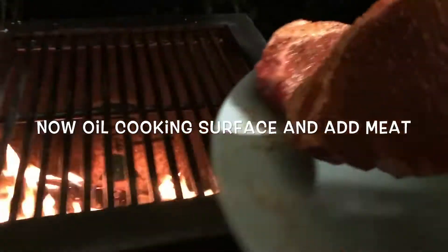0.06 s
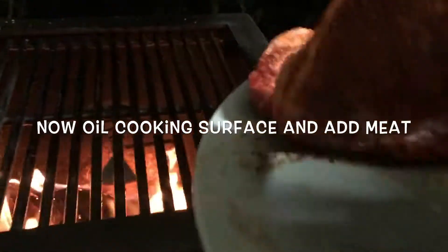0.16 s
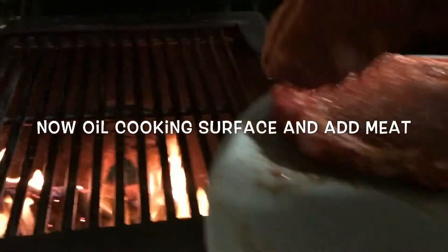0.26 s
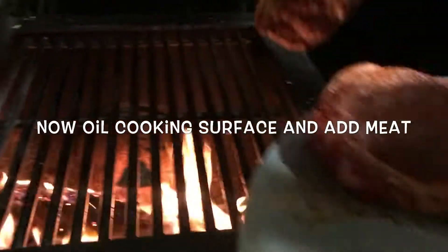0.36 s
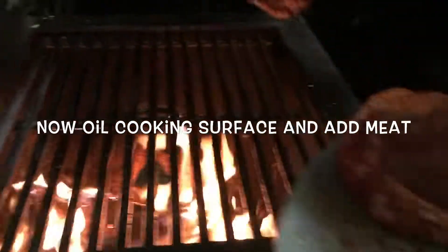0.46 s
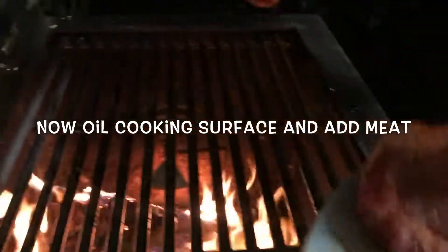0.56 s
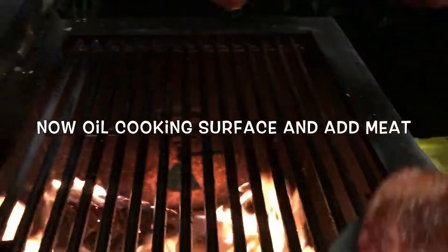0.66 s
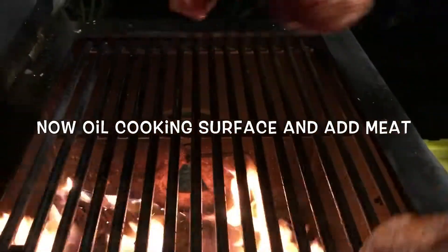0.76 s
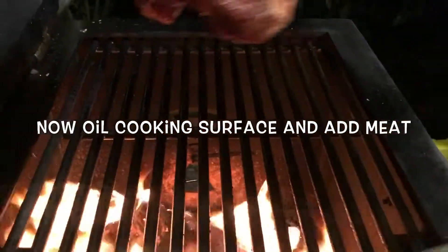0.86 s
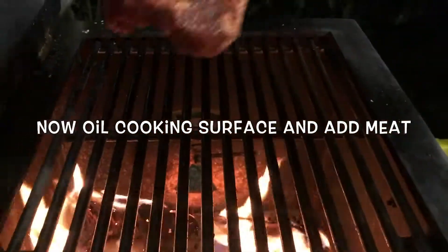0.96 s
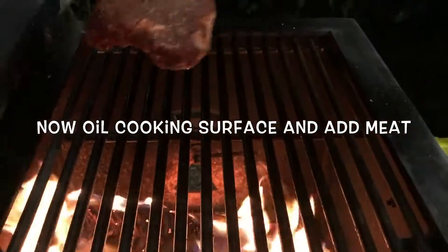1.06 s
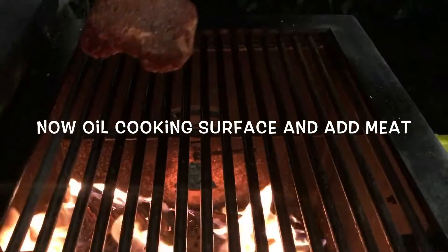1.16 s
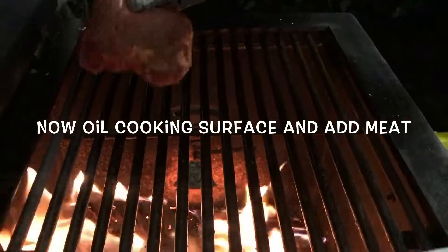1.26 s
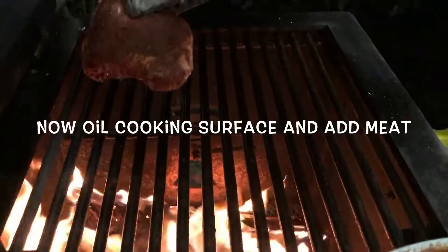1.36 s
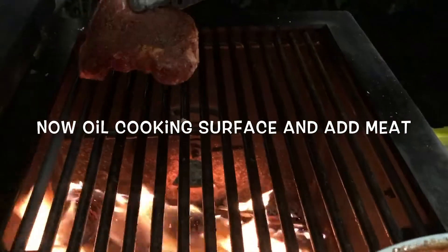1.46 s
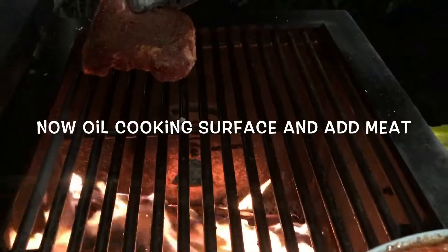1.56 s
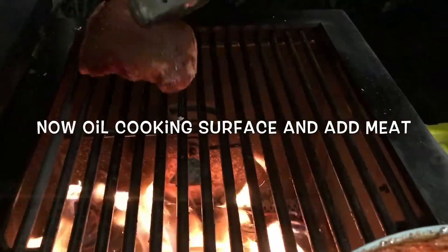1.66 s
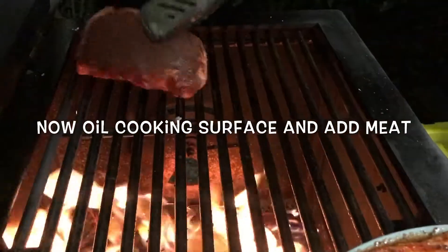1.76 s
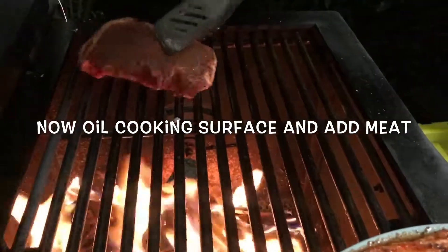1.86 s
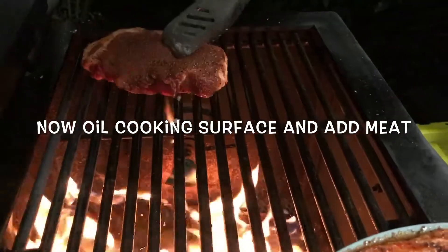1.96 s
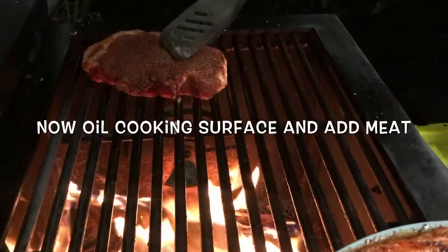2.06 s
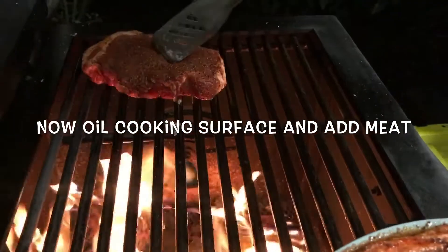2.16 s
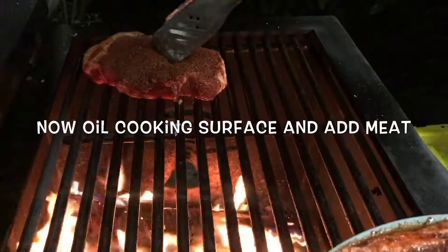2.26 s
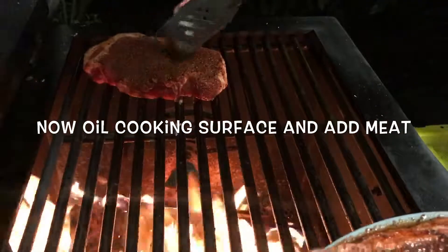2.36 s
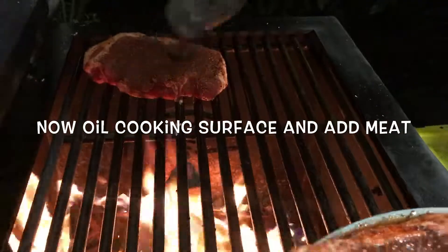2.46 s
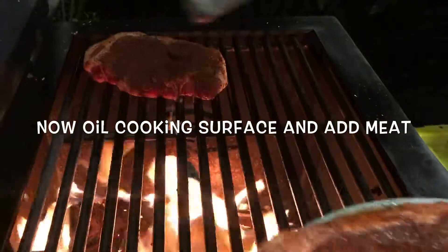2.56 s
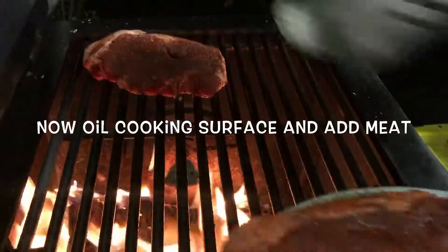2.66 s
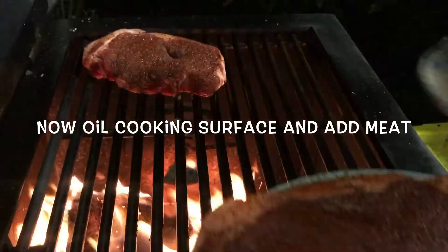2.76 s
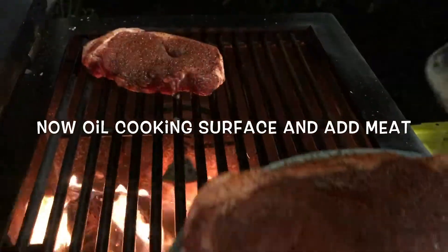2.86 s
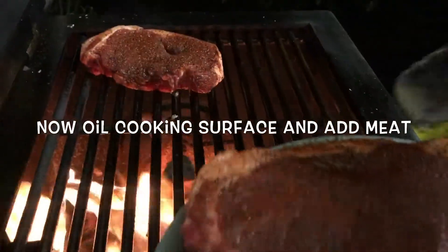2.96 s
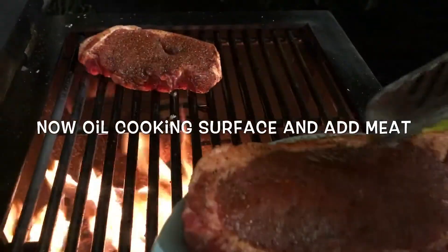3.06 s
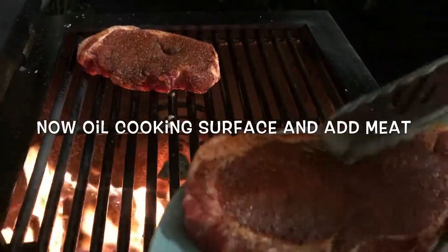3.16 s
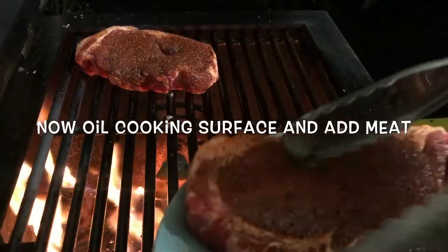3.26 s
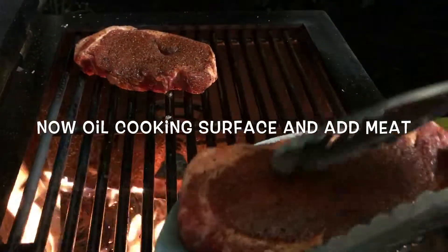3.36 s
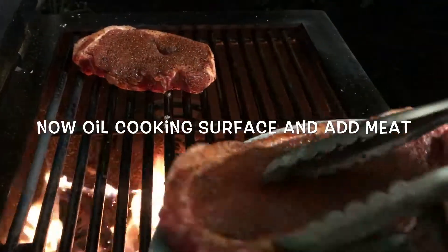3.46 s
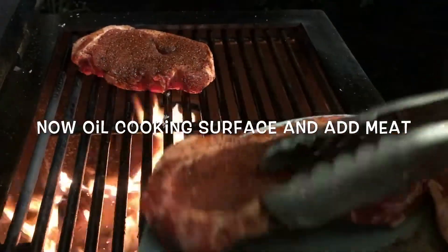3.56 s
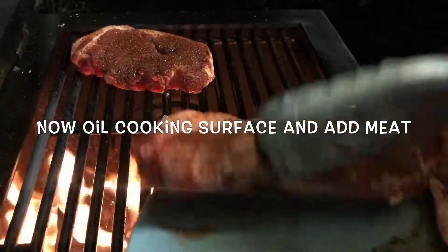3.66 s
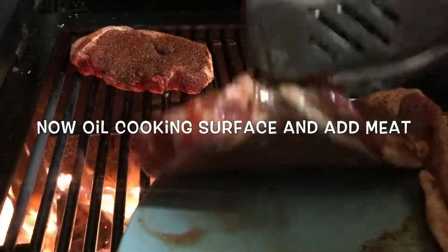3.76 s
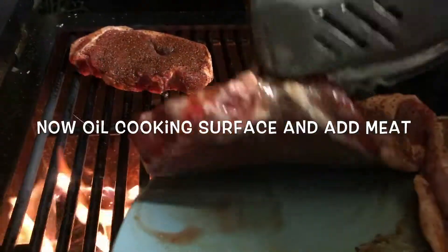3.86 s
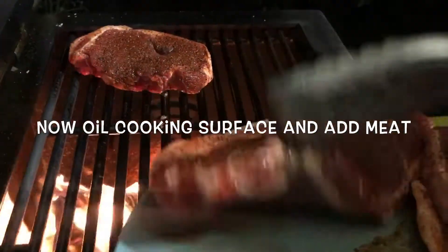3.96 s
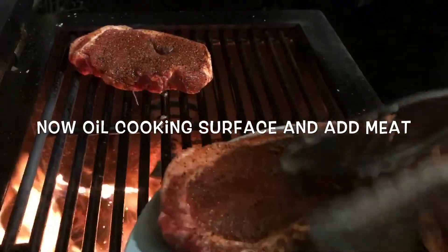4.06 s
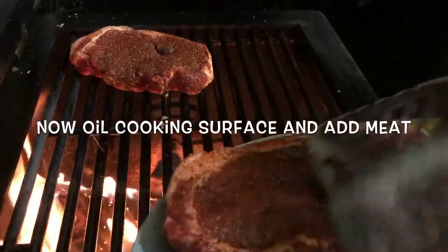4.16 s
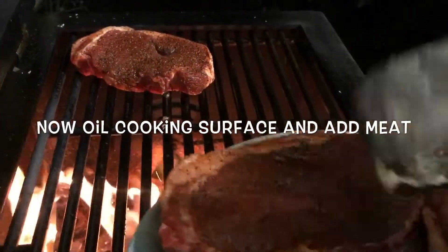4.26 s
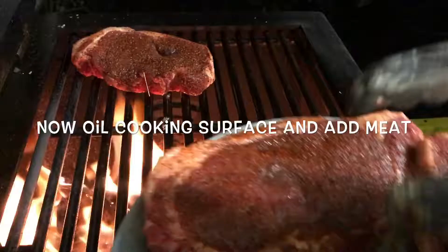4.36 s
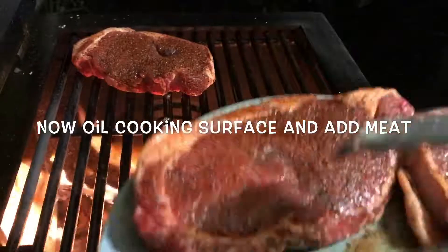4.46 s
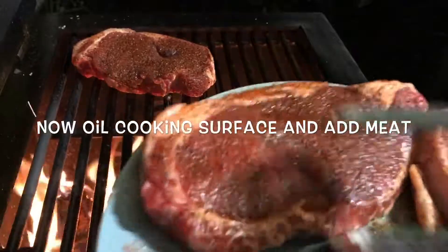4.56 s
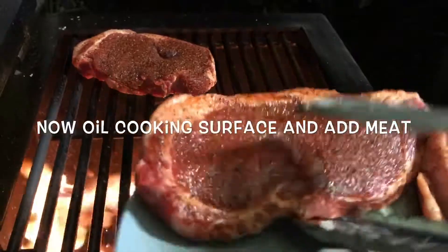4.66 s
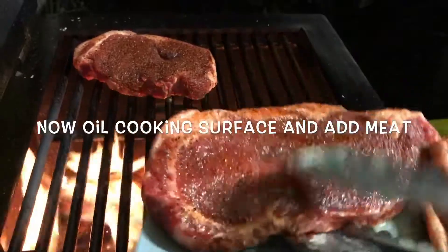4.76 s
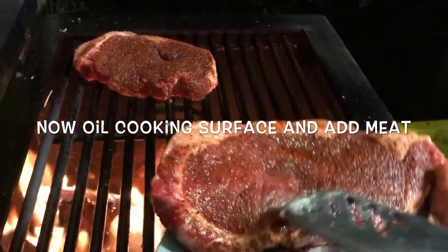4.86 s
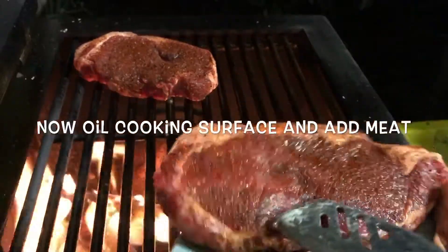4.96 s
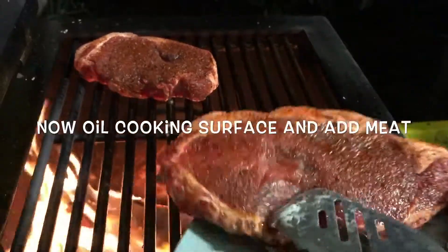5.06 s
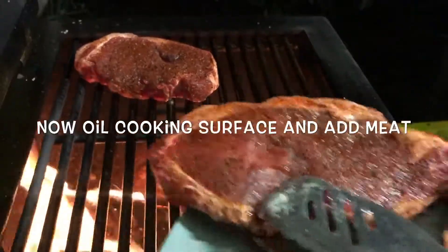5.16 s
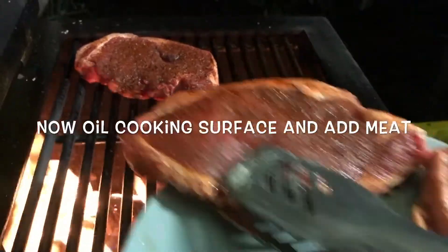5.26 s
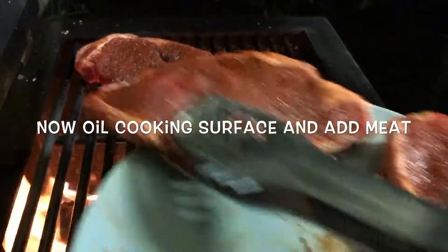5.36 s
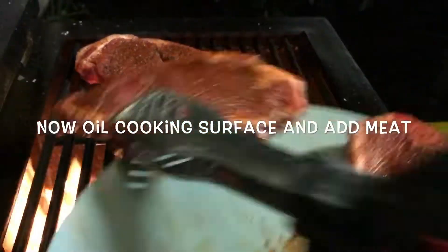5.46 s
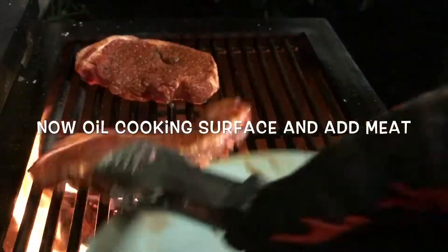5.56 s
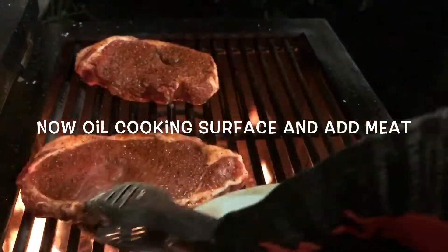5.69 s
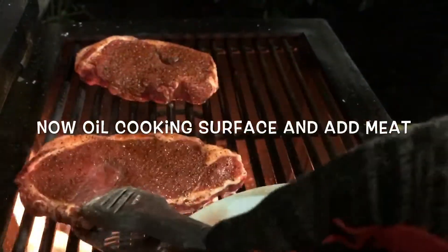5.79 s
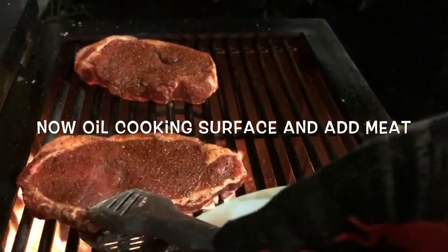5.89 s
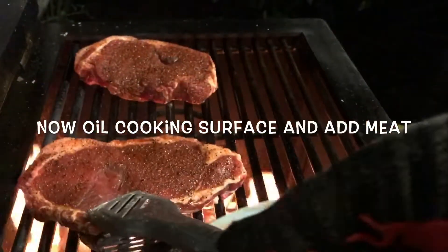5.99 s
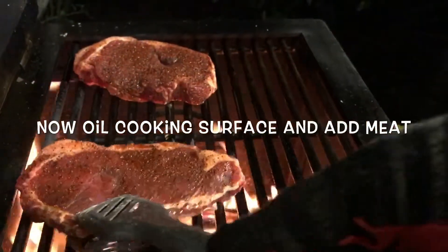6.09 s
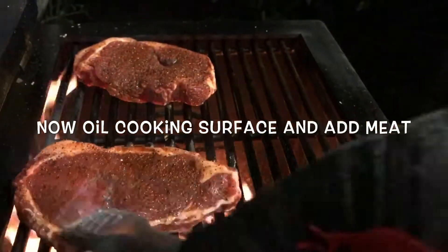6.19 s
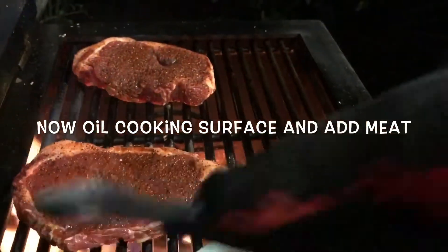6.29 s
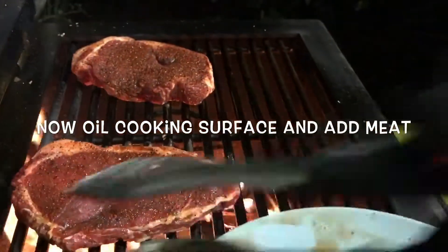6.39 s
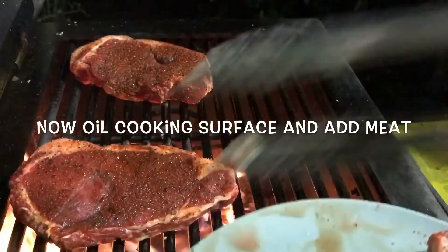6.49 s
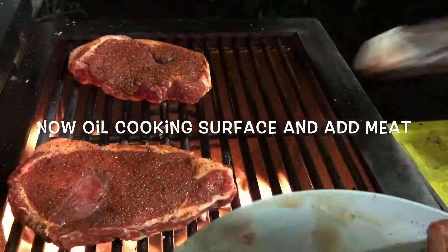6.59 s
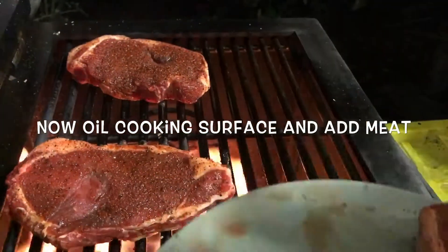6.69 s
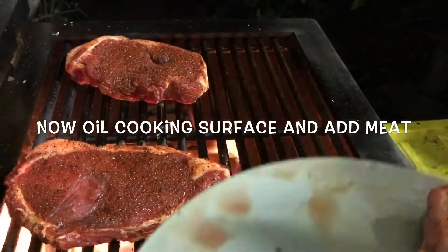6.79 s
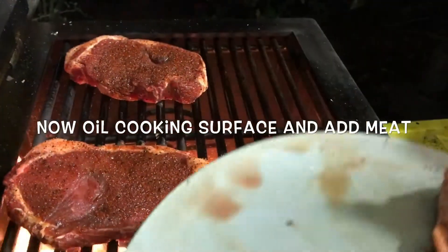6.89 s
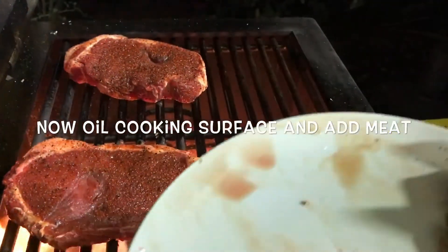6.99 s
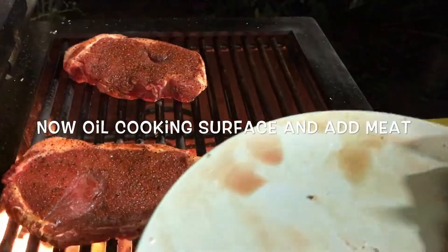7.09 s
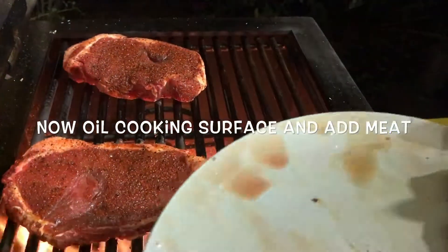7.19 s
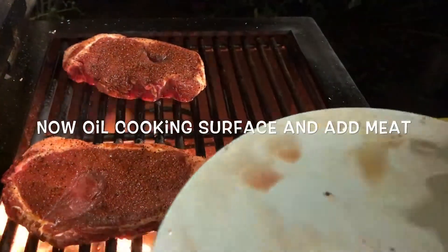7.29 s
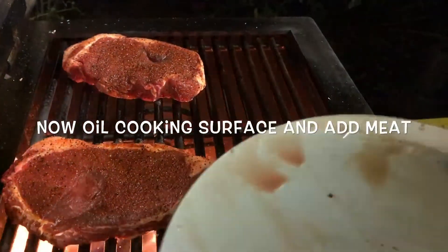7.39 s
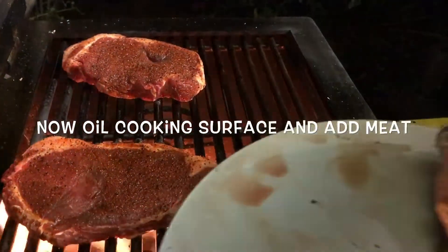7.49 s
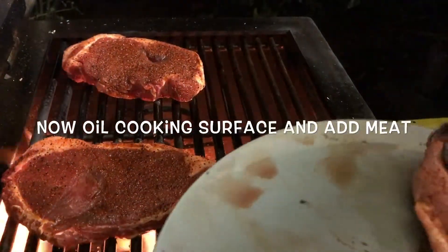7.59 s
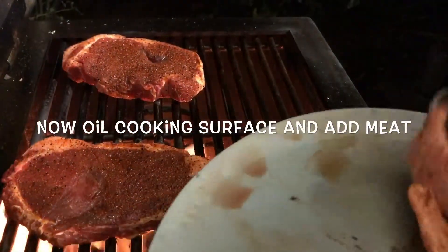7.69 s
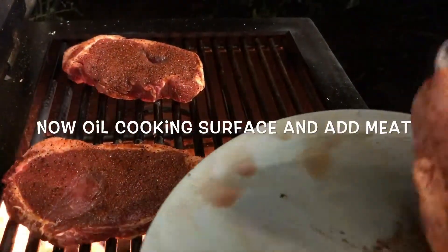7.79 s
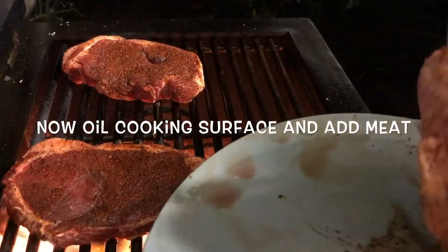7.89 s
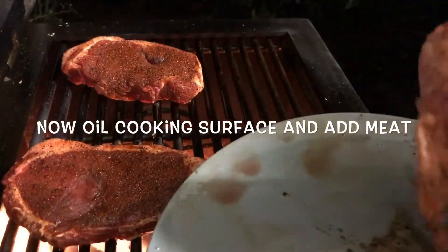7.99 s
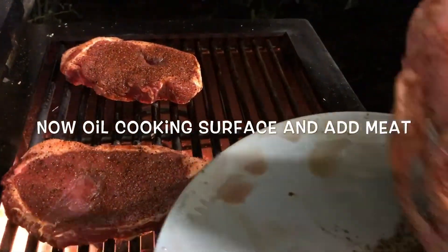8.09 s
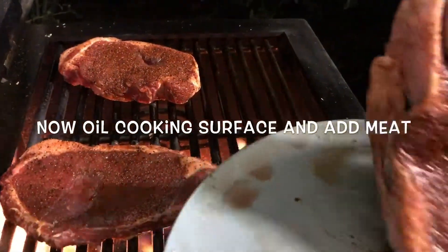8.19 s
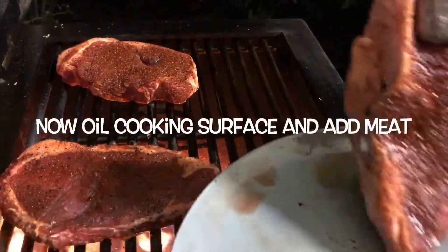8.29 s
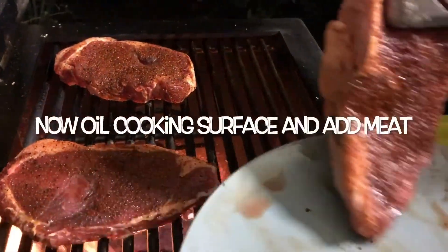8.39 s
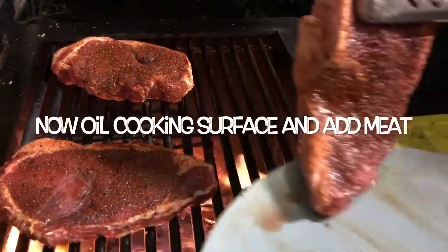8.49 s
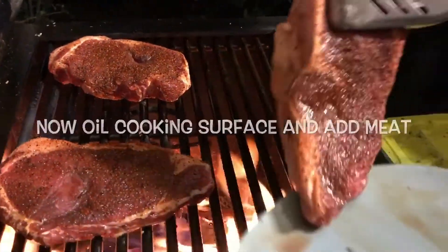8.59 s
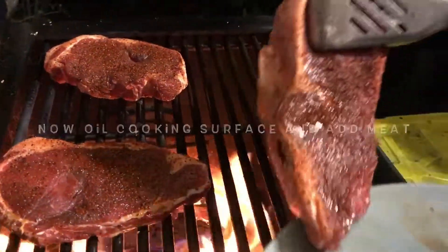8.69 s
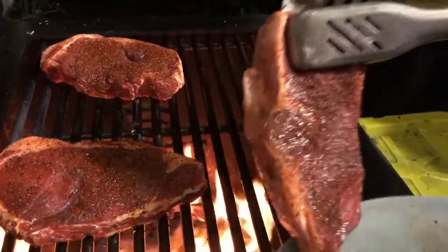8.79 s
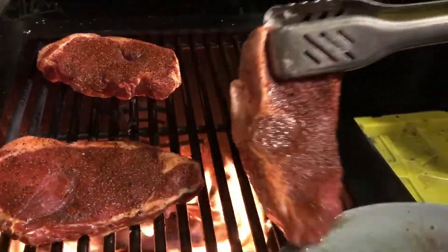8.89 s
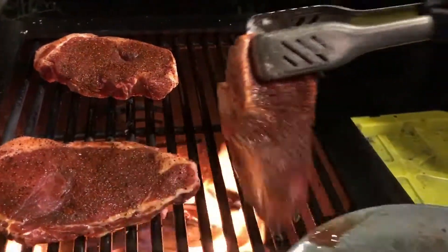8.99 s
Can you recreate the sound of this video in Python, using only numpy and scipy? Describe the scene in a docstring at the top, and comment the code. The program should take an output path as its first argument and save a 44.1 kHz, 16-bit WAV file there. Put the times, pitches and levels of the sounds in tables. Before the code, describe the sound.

Fire rumbles low beneath everything, ticking softly. Wet meat meets hot bars, spitting and then hissing finely; later another piece joins and the sizzle becomes fuller, slowly easing. Steel tongs rap and scrape a plate deadened by meat, their blades click and briefly squeak, and they clank once on the grate. Heard close up in the open air, with only a short dull tail on the contacts.

```python
"""Outdoors at night, steaks are laid on a hot grate over a wood fire.
The fire rumbles and ticks: coloured noise, hollow resonances and tiny random impulses.
One steak starts to sizzle and a second joins it: bubble bursts over steam noise, fading as the meat dries.
Steel tongs knock and scrape on the serving plate, which the meat damps, and clank once on the grate;
each body rings as a set of fading sine waves."""
import sys
import numpy as np
from scipy import signal
from scipy.fft import rfft, irfft, next_fast_len
from scipy.io import wavfile

SR = 44100
rng = np.random.default_rng(int(sys.argv[2]) if len(sys.argv) > 2 else 0)


def file_out(sig):
    """Save sig as 16-bit WAV at sys.argv[1]."""
    # one column per channel
    cols = np.atleast_2d(sig).T
    # limit, then scale
    lim = np.clip(cols, -1, 1)
    pcm = np.round(lim * 32767).astype(np.int16)
    wavfile.write(sys.argv[1], SR, pcm)


N = 398663
TIME = np.arange(N) / SR


def from_db(db):
    """Turn decibels into a gain."""
    return 10 ** (np.asarray(db) / 20)


def rms_one(x):
    """Scale a signal to an rms of 1."""
    return x / np.sqrt(np.mean(x ** 2) + 1e-20)


def filtered(x, order, edges_hz, kind):
    """Keep only the low, high or middle band of a signal."""
    return signal.sosfilt(signal.butter(order, edges_hz, kind, fs=SR, output="sos"), x)


def add(out, start_s, sound):
    """Mix a sound in; whatever falls outside the scene is cut off."""
    start = int(round(start_s * SR))
    sound, start = sound[max(-start, 0):], max(start, 0)
    out[start:start + len(sound)] += sound[:max(N - start, 0)]


def coloured(x, spectrum):
    """Shape a signal with a smooth curve of level against pitch; rms 1."""
    pitch_hz, level_db = np.transpose(spectrum)
    size = next_fast_len(len(x))
    bins_hz = np.fft.rfftfreq(size, 1 / SR) + 1  # plus 1 avoids the logarithm of zero
    curve_db = np.interp(np.log(bins_hz), np.log(pitch_hz), level_db, left=-80, right=-80)
    shaped = irfft(rfft(x, size) * from_db(curve_db), size)
    return rms_one(shaped[:len(x)])


def drift(knots_per_s):
    """A random wander along straight lines between random points; rms 1."""
    knots = rng.standard_normal(int(N / SR * knots_per_s) + 2)
    return rms_one(np.interp(TIME * knots_per_s, np.arange(len(knots)), knots))


def grains(per_s, spread_db, size):
    """Tiny impulses at random moments, many weak and a few strong."""
    born = rng.random(size) < per_s / SR
    strength = from_db(spread_db * np.minimum(rng.exponential(1, size), 6))
    return born * strength * rng.choice([-1, 1], size)


def dying(t, t60):
    """An envelope that falls 60 dB in t60 seconds."""
    return from_db(-60 * t / t60)


def blown(resonances):
    """Turbulent air, as noise, drives a set of resonances; rms 1."""
    push = rng.standard_normal(N)
    out = np.zeros(N)
    for pitch_hz, width_hz, level_db in resonances:
        b, a = signal.iirpeak(pitch_hz, pitch_hz / width_hz, fs=SR)
        out += from_db(level_db) * signal.lfilter(b, a, push)
    return rms_one(out)


def ringing(modes, t, ring=1, pitch=1):
    """A struck body sounds many fading tones at once; neighbours start in opposite directions."""
    out = np.zeros(len(t))
    for k, (pitch_hz, level_db, t60_s) in enumerate(modes):
        tone = np.sin(2 * np.pi * pitch_hz * pitch * t)
        out += (-1) ** k * from_db(level_db) * dying(t, t60_s * ring) * tone
    return out


# the low, middle and high register of a contact: low_edge_hz, high_edge_hz
REGISTERS = [(250, 1433), (1400, 3900), (4200, 15600)]


def voiced(x, level_db, bright_db, hump_db, seconds):
    """A harder touch tips the level from the low register to the high; the hump lifts the middle."""
    side_db = level_db - hump_db
    levels_db = (side_db - bright_db, level_db, side_db + bright_db)
    out = np.zeros(len(x))
    for edges_hz, band_db in zip(REGISTERS, levels_db):
        band = filtered(x, 3, edges_hz, "band")
        # each register's energy is set as an rms over the given time
        out += from_db(band_db) * band / np.sqrt(np.sum(band ** 2) / (seconds * SR))
    return out


def blows(rows, modes, crack_db, crack_t60, hump_db, trim_db):
    """Each blow is a brief rough crack of noise plus the ring of the body that is struck."""
    out, t = np.zeros(N), TIME[:SR // 3]
    for start_s, level_db, bright_db, ring in rows:
        crack = from_db(crack_db) * rng.standard_normal(len(t)) * dying(t, crack_t60)
        blow = ringing(modes, t, ring) + crack
        add(out, start_s, voiced(blow, level_db, bright_db, hump_db, seconds=.01))
    return from_db(trim_db) * out


GRIP_DB = 13  # pressing harder brightens a stroke and damps the body: this much brightness halves the ring
# the band in which sliding steel rasps: low_edge_hz, high_edge_hz
RASP_HZ = (830, 7500)


def strokes(rows, modes, ring, pitch, slips_per_s, spread_db, rasp_db, hump_db, trim_db):
    """Steel sticks and slips: a swell of tiny impulses rings the body and rasps."""
    out = np.zeros(N)
    for middle_s, half_length_s, level_db, bright_db in rows:
        size = int(2 * half_length_s * SR)
        slips = grains(slips_per_s, spread_db, size) * np.hanning(size)
        grip_ring = ring * 2 ** (-bright_db / GRIP_DB)
        body = ringing(modes, TIME[:SR // 10], grip_ring, pitch)
        sound = signal.fftconvolve(slips, body / np.linalg.norm(body))
        sound[:size] += from_db(rasp_db) * filtered(slips, 2, RASP_HZ, "band")
        stroke = voiced(sound, level_db, bright_db, hump_db, half_length_s)
        add(out, middle_s - half_length_s, stroke)
    return from_db(trim_db) * out


# colour of the fire's roar: pitch_hz, level_db (per Hz)
FIRE = [(20, -13), (32, -29), (45, -1.5), (62, 0.5), (110, 2.5), (170, -0.5), (250, -2), (310, -14),
        (400, -26.5), (650, -20), (1100, -25.5), (2500, -34), (6000, -40), (16000, -47)]
# air resonances of the firebox: pitch_hz, width_hz, level_db (against each other)
FIREBOX = [(143.5, 12, -5.5), (187, 11, -4), (241.6, 17.6, -7.5)]
# slow random rise and fall of the fire's level, before the trim: time_s, level_db
FIRE_LEVEL = [(0.0, -47.5), (0.48, -45.5), (1.08, -47.5), (2.11, -46.5), (5.39, -47.5), (5.74, -49),
              (6.54, -46), (6.82, -50), (7.12, -44.5), (9.04, -48)]


def flames(box_db, flutter_db, trim_db):
    """Turbulent flames roar as coloured noise, and separate noise booms in the firebox."""
    roar = coloured(rng.standard_normal(N), FIRE)
    boom = filtered(blown(FIREBOX), 2, 400, "low")
    time_s, level_db = np.transpose(FIRE_LEVEL)
    slow_db = np.interp(TIME, time_s, level_db)
    flutter = flutter_db * drift(15)
    return from_db(trim_db + slow_db + flutter) * (roar + from_db(box_db) * boom)


# whistling resonances in the embers: pitch_hz, width_hz, level_db (against each other)
EMBERS = [(1720, 170, 6), (3900, 250, 2), (4400, 390, 7), (5300, 180, 4), (6900, 400, -2), (8000, 300, 3),
          (12600, 700, 3)]


def ember_whistle(level_db):
    """Hot air whistles faintly through the embers, its level wandering by about 1 dB."""
    return from_db(level_db + drift(6.5)) * blown(EMBERS)


# colour of a spit, pop or ember tick: pitch_hz, level_db (per Hz)
SPIT_COLOUR = [(600, 3), (2500, -12.5), (3800, 4.5), (5000, -5.5), (6300, 5), (8000, -1), (10400, 0),
               (13000, 0.5), (17000, 3)]


def ember_ticks(level_db):
    """The embers tick faintly all the while: random impulses in the colour of a spit."""
    return from_db(level_db) * coloured(grains(43, 1.8, N), SPIT_COLOUR)


# ringing tones of the loaded plate: pitch_hz, level_db (against each other), t60_s (before ring factors)
PLATE = [(398, -45, 0.0017), (890, -3, 0.01), (1017, 6, 0.028), (1335, -8, 0.025), (1792, 4, 0.026),
         (1940, 2, 0.026), (2253, 2, 0.024), (2630, 3.5, 0.018), (2917, -0.5, 0.05), (3124, -1, 0.019),
         (3800, -5.5, 0.016), (4670, -20, 0.034), (5810, -7.5, 0.033), (7260, -14.5, 0.019),
         (8740, -20, 0.042), (11500, -17, 0.033)]
# rubs and scrapes, mostly tongs and meat on the plate; at 1.36 s a faint rub of tongs on meat
# middle_s, half_length_s, level_db (before the trim), brightness_db
SCRAPES = [(.02, 0.089, -53, 0.5), (.105, 0.043, -55, -9), (1.36, 0.22, -68, -7), (3.29, 0.034, -36, 5),
           (3.352, 0.058, -33, 0.5), (3.41, 0.1, -49.5, -10), (3.505, .055, -45, 1),
           (4.66, 0.081, -46.5, -4), (4.86, 0.18, -51, -1), (4.99, .05, -51.5, 12), (5.04, .033, -46, 5),
           (5.6, .016, -38.5, -14), (5.636, .025, -36.5, -10), (5.72, 0.042, -36.5, -7), (7.3, .08, -49, 9),
           (7.379, 0.024, -35, 7.5)]


def scrapes_and_rubs():
    """Many small slips ring the plate's tones a little sharp, with a strong rasp."""
    return strokes(SCRAPES, PLATE, ring=0.5, pitch=1.04, slips_per_s=1300, spread_db=1.2,
                   rasp_db=3.5, hump_db=5.5, trim_db=-2.5)


# tongs knock on the plate: start_s, level_db (before the trim), brightness_db, ring (factor on t60)
KNOCKS = [(.0757, -42, -8.5, .2), (.0838, -42, -8, 0.17), (1.105, -53.5, -5, 0.67),
          (3.2691, -12.5, -6.5, 1.05), (3.7545, -42, 3.5, 0.53), (4.121, -48, 0, .7),
          (4.1728, -30, -10, 1.1), (4.5583, -33.5, -17.5, 0.99), (5.0216, -38, 7, 0.92),
          (5.5128, -15.5, -5.5, 0.19), (5.588, -34.5, -15, 0.61), (5.8868, -23.5, 4, 0.2),
          (7.2503, -17, 8, 0.5), (7.6716, -43.5, 12, 0.16), (7.8646, -41, 11, 0.29)]


def plate_knocks():
    """Tongs strike the plate; the meat on it shortens the ring."""
    return blows(KNOCKS, PLATE, crack_db=-4.5, crack_t60=0.011, hump_db=7, trim_db=-2.5)


# dull bumps of plate and meat: start_s, pitch_hz, level_db, t60_s
BUMPS = [(.084, 329, -34.5, 0.21), (1.521, 190, -32.5, 0.04), (5.513, 294, -17, 0.012),
         (6.457, 192, -33, 0.085), (7.511, 282, -31.5, 0.047), (7.511, 595, -33, 0.016)]


def bumps():
    """Soft, heavy contacts each sound one low fading tone."""
    out, t = np.zeros(N), TIME[:SR // 4]
    for start_s, pitch_hz, level_db, t60_s in BUMPS:
        add(out, start_s, ringing([(pitch_hz, level_db, t60_s)], t))
    return out


# ringing tones of the tongs' blades: pitch_hz, level_db (against each other), t60_s (before ring factors)
TONGS = [(1067, -2.5, 0.026), (2720, -6, 0.0081), (3310, -4, 0.029), (4120, -3.5, 0.015), (4510, -9, 0.037),
         (6090, 11.5, 0.0044), (6930, -5, 0.026), (7060, -5.5, 0.034), (9750, -1.5, 0.016),
         (13000, 0, 0.0045)]
# the blades click: start_s, level_db (before the trim), brightness_db, ring (factor on t60)
CLICKS = [(.1347, -51.5, 6, .86), (3.6178, -49, 11, 0.95), (3.6786, -54, 24.5, 0.58), (3.7944, -48, 20, .4),
          (3.8333, -28, 9, 0.51), (4.5726, -42.5, 19.5, 0.81), (4.7472, -38, 21, 1), (4.776, -46, 9, .7),
          (4.8924, -46, 12, .6), (5.586, -32, 10, 1), (6.307, -38, 16, 1), (8.338, -40, 7.5, 0.58)]


def blade_clicks():
    """The blades of the tongs click, with a strong crack over a short ring."""
    return blows(CLICKS, TONGS, crack_db=5.5, crack_t60=0.014, hump_db=10, trim_db=-2.5)


# the loudest spits of fat and embers: start_s, level_db (before the trim), lowest_hz
SPITS = [(.446, -60, 1200), (.5096, -53.5, 9000), (0.7314, -50.5, 5000), (.747, -48, 2500),
         (.8007, -54.5, 5000), (1.2228, -51, 5000), (1.483, -39.5, 3000), (1.487, -32, 2500),
         (1.5208, -38, 2500), (1.541, -42, 2500), (1.797, -35, 1000), (1.989, -31.5, 2000),
         (5.162, -37, 4000), (9.0182, -32.5, 4130)]


def spits(t60, trim_db):
    """Single spits burst sharply: coloured noise that dies at once, without its lows."""
    out, t = np.zeros(N), TIME[:SR // 20]
    for start_s, level_db, lowest_hz in SPITS:
        burst = coloured(rng.standard_normal(len(t)), SPIT_COLOUR) * dying(t, t60)
        burst = filtered(burst, 2, lowest_hz, "high")
        add(out, start_s, from_db(level_db + trim_db) * rms_one(burst))
    return out


HEAT_SOAK_S = .002  # the first rush of heat into a freshly laid patch
# wet meat or juice meets the hot bars; in order: the first steak's edge, the first steak laid flat,
# the second dropped, then pressed, and juice running out
# start_s, spread_s (time to spread), crackle_db, hiss_db (both before trims), drying_db_per_s
SEARS = [(1.483, 0.012, -65, -56, 12), (1.689, 0.39, -48, -38.5, 0.84), (5.634, .04, -47.5, -37, 0.63),
         (5.98, 0.27, -52.5, -40.5, 0.8), (8.2, 0.59, -51, -42.5, 2)]


def boiling():
    """Heat enters each patch as one over the root of its time on the bars, while the patch dries."""
    crackle, hiss = np.zeros(N), np.zeros(N)
    for start_s, spread_s, crackle_db, hiss_db, drying_db_per_s in SEARS:
        # the contact grows ever faster until the meat lies flat
        laid = np.arange(1, int(spread_s * SR) + 2)
        wetness = from_db(-drying_db_per_s * TIME) ** 2
        patch = wetness / (2 * np.sqrt(TIME + HEAT_SOAK_S))
        power = signal.oaconvolve(patch, laid / laid.sum())[:N]
        add(crackle, start_s, from_db(crackle_db) ** 2 * power)
        add(hiss, start_s, from_db(hiss_db) ** 2 * power)
    return np.sqrt(np.abs([crackle, hiss]))  # power to gain


def sizzle_part(spectrum, per_s, steam_db):
    """Countless bursting bubbles over a smooth rush of steam; rms 1."""
    bubbles = rms_one(grains(per_s, 3.5, N))
    steam = from_db(steam_db) * rng.standard_normal(N)
    return coloured(bubbles + steam, spectrum)


# colours of the two parts of the sizzle: pitch_hz, level_db (per Hz)
CRACKLE = [(400, -10.5), (900, -6.5), (1400, -5), (2200, -2), (2700, 0), (3400, 2), (4200, 3), (5000, 1),
           (6500, -6)]
HISS = [(3500, -33), (4900, -9), (5300, -1), (7100, 1.5), (7700, -1), (8500, 3.5), (9600, 4), (10450, -1),
        (11100, 3.5), (12800, 4), (14300, 3.5), (18000, -4)]


def sizzle(crackle_trim_db, hiss_trim_db, pops_db, seethe_db):
    """Large bubbles crackle, small ones hiss and drops of fat pop, all as hard as the juice boils."""
    crackle_gain, hiss_gain = boiling()
    crackle = crackle_gain * sizzle_part(CRACKLE, per_s=1800, steam_db=1.5)
    hiss = hiss_gain * sizzle_part(HISS, per_s=6600, steam_db=4.0)
    pops = hiss_gain * coloured(grains(60, 3.3, N), SPIT_COLOUR)
    mix = from_db(crackle_trim_db) * crackle + from_db(hiss_trim_db) * hiss + from_db(pops_db) * pops
    return mix * from_db(seethe_db * drift(60))


# hard surfaces near the meat: delay_s, strength (gain; minus flips the wave)
MIRRORS = [(.00195, 0.058), (.0034, -0.046)]


def mirrored(x):
    """Early reflections ripple the spectrum."""
    out = x.copy()
    for delay_s, strength in MIRRORS:
        add(out, delay_s, strength * x)
    return out


# ringing tones of the grate: pitch_hz, level_db (against each other), t60_s (before ring factors)
GRATE = [(650, 0.5, 0.083), (1465, 7, 0.039), (1483, -10, 0.19), (2010, -1, 0.048), (2180, -12, 0.056),
         (2210, -5, 0.12), (2430, -3, 0.1), (2910, -5, 0.24), (3130, -9, 0.11), (3620, 2.5, 0.04),
         (4350, -5.5, 0.1), (4920, 5.5, 0.028), (5700, 0, .04), (6440, 7, 0.033), (8600, 7, .025)]
# tongs scuff along the bars: middle_s, half_length_s, level_db (before the trim), brightness_db
CHATTER = [(1.797, 0.016, -45, 13), (2.066, .022, -36, 13), (6.395, .018, -26.5, -1),
           (6.43, .055, -36.5, -4)]


def grate_chatter():
    """Tongs scuff and chatter along the bars in dense slips, mostly rasp."""
    return strokes(CHATTER, GRATE, ring=0.51, pitch=.98, slips_per_s=3400, spread_db=1.0,
                   rasp_db=12, hump_db=13, trim_db=-4.0)


# the blades squeak: middle_s, half_length_s, level_db (before the trim), brightness_db
SQUEAKS = [(4.837, 0.045, -33.5, 10), (5.531, .01, -30.5, 18.5), (5.562, 0.038, -33.5, 13)]


def blade_squeaks():
    """Dense slips ring the tongs' blades, with little rasp."""
    return strokes(SQUEAKS, TONGS, ring=1.9, pitch=1.01, slips_per_s=2400, spread_db=2.5,
                   rasp_db=-7, hump_db=14, trim_db=-4.0)


# tongs meet the grate: start_s, level_db (before the trim), brightness_db, ring (factor on t60)
CLANKS = [(6.3785, -21.5, 6.5, 0.71)]


def grate_clank():
    """The tongs strike the grate, which rings under a rough crack."""
    return blows(CLANKS, GRATE, crack_db=5, crack_t60=0.029, hump_db=8.5, trim_db=0.5)


def surroundings(x, t60, wet_db, dull_hz):
    """The grill's hood and nearby things scatter a short, dull tail, made of fading noise."""
    t = TIME[:SR // 2]
    scatter = rng.standard_normal(len(t)) * dying(t, t60) * (t > .004)
    scatter = filtered(scatter / np.linalg.norm(scatter), 1, dull_hz, "low")
    return x + from_db(wet_db) * signal.fftconvolve(x, scatter)[:N]


def scene():
    """Fire, meat and tongs, the same in both channels."""
    fire = flames(box_db=-3.0, flutter_db=1.67, trim_db=-0.44) + ember_whistle(level_db=-73.5)
    handling = scrapes_and_rubs() + plate_knocks() + bumps() + blade_clicks()
    handling += grate_chatter() + blade_squeaks() + grate_clank()
    near = handling + ember_ticks(level_db=-76.5) + spits(t60=0.024, trim_db=-9.5)
    meat = sizzle(crackle_trim_db=2.0, hiss_trim_db=0.5, pops_db=-15.5, seethe_db=0.77)
    mono = fire + mirrored(meat) + surroundings(near, t60=0.13, wet_db=-12.5, dull_hz=7100)
    return np.stack([mono, mono])


CUTOFF_HZ = 15800


def record(dry):
    """The top is cut steeply above the cutoff."""
    return signal.sosfilt(signal.ellip(10, .1, 80, CUTOFF_HZ, fs=SR, output="sos"), dry)


dry = scene()
out = record(dry)
file_out(out)
```